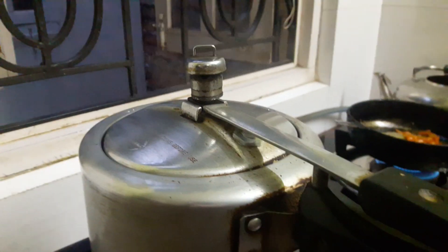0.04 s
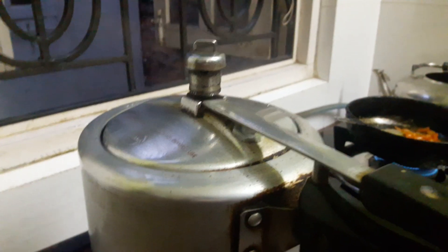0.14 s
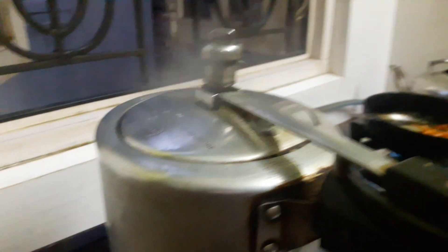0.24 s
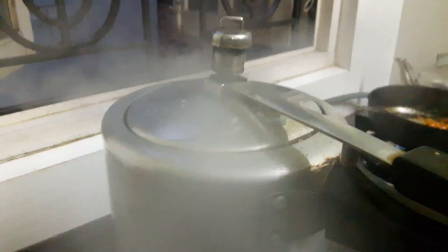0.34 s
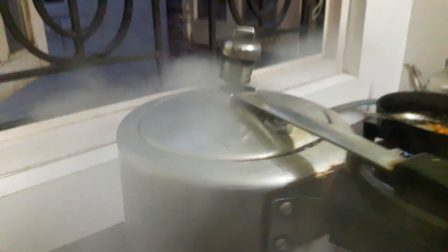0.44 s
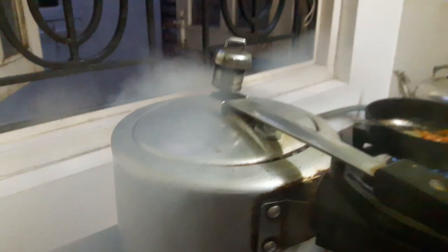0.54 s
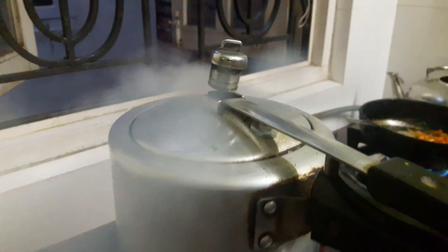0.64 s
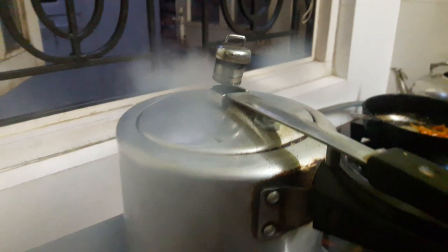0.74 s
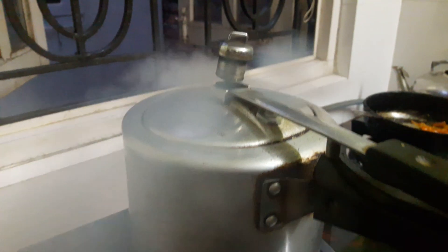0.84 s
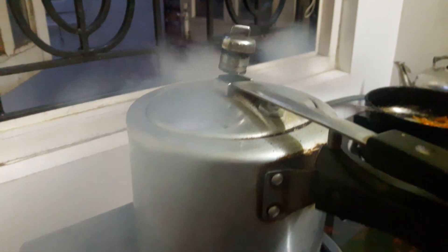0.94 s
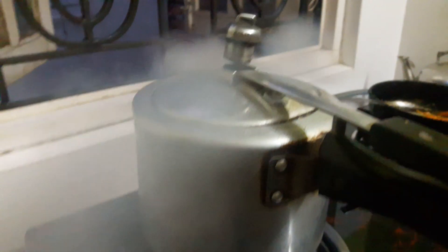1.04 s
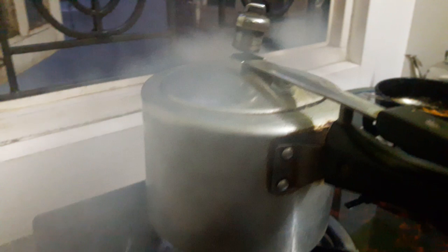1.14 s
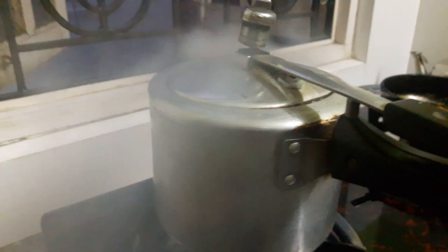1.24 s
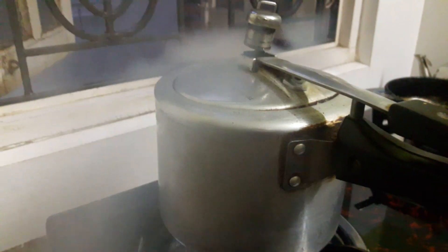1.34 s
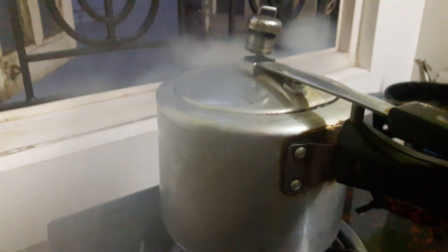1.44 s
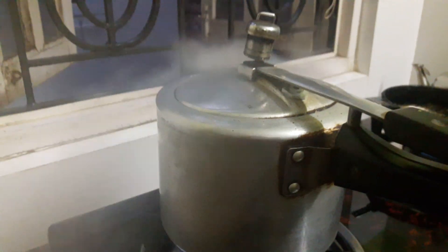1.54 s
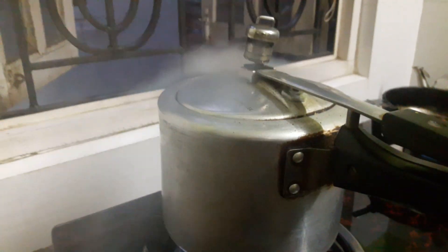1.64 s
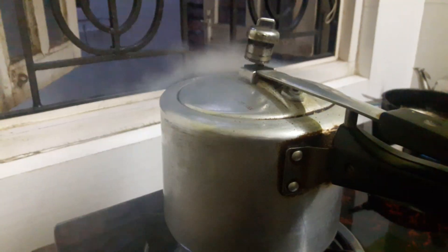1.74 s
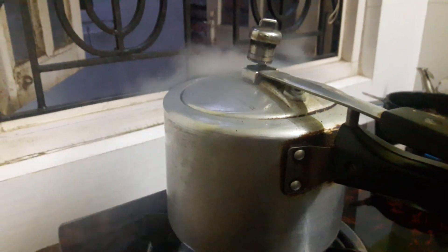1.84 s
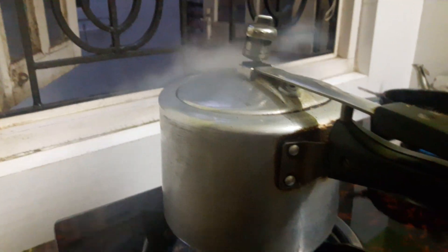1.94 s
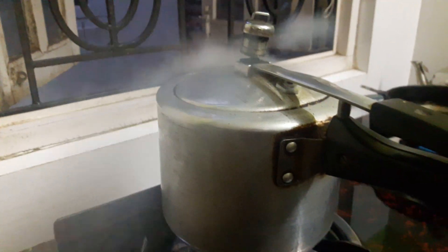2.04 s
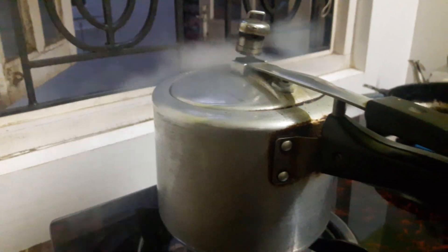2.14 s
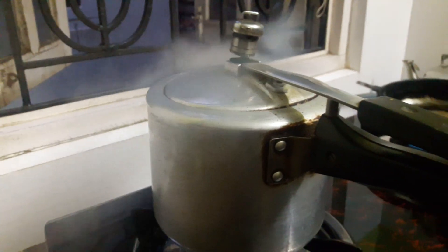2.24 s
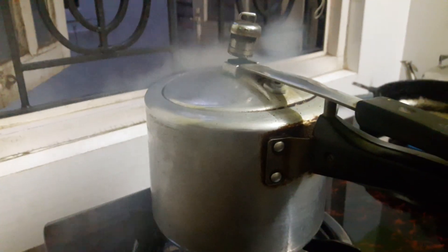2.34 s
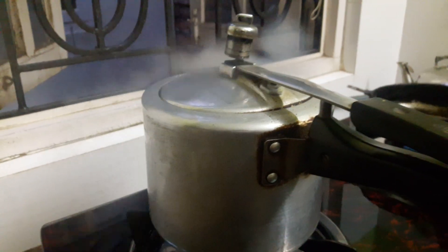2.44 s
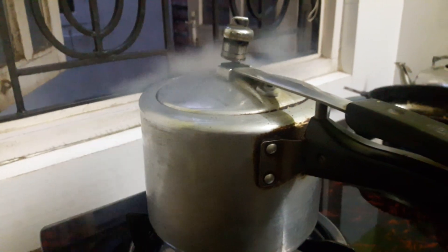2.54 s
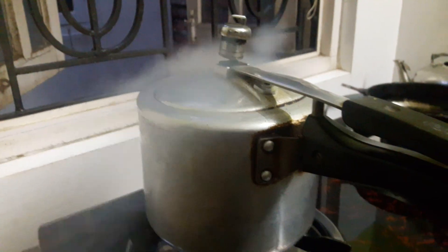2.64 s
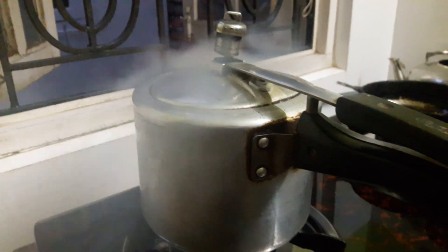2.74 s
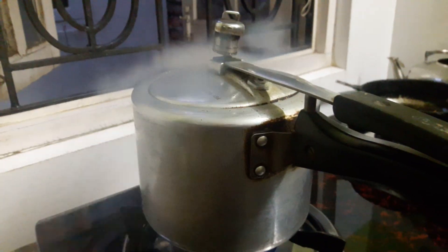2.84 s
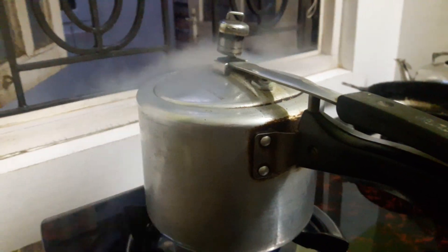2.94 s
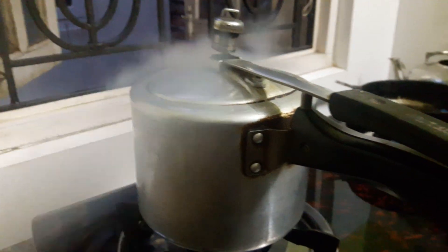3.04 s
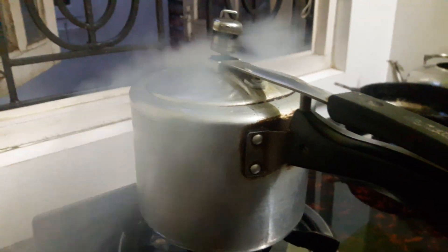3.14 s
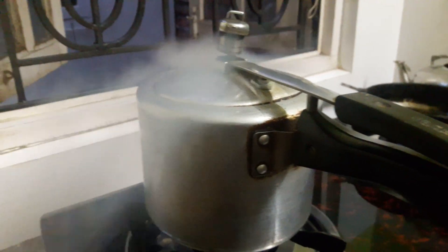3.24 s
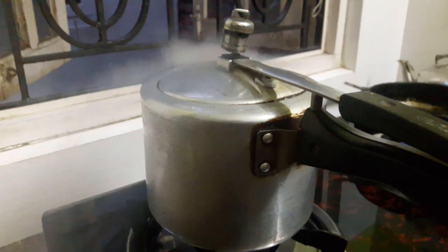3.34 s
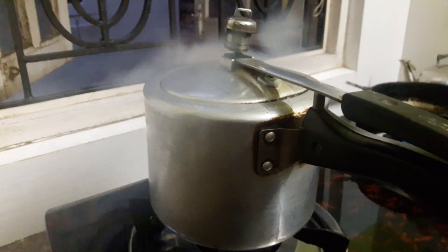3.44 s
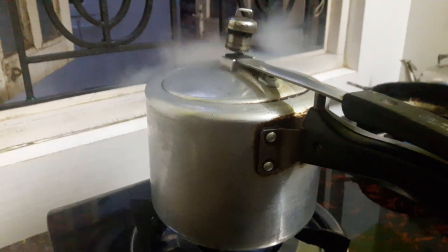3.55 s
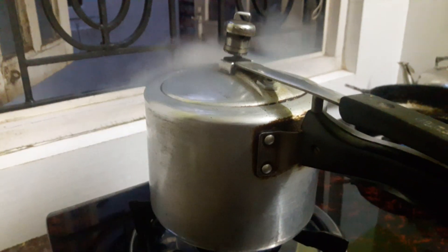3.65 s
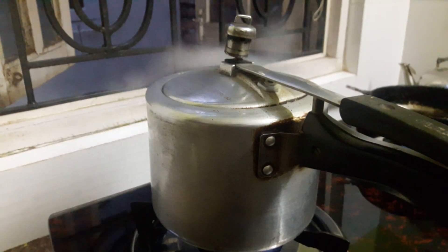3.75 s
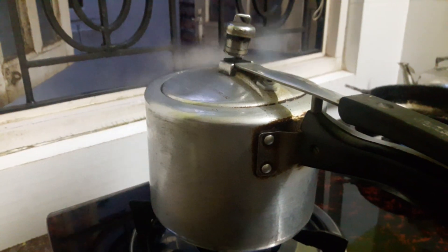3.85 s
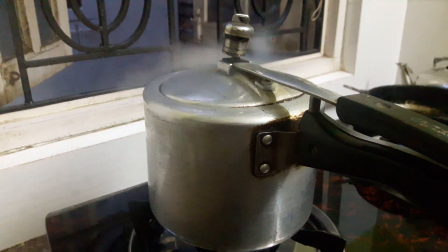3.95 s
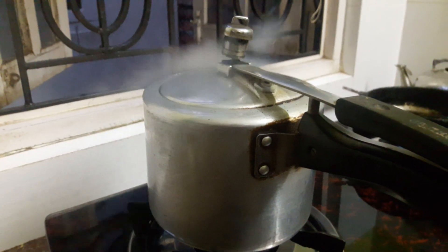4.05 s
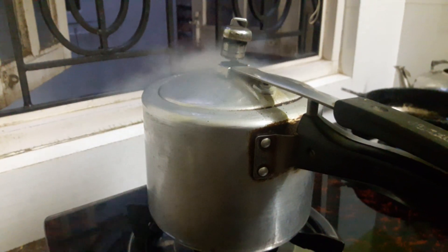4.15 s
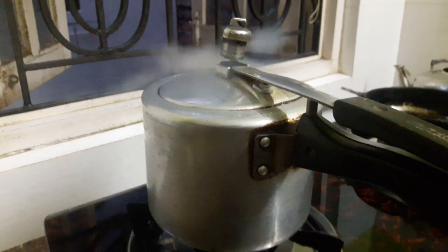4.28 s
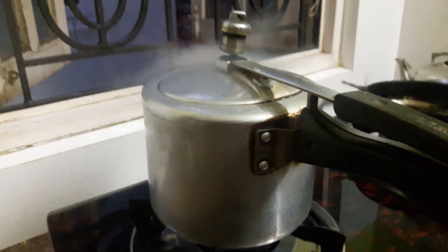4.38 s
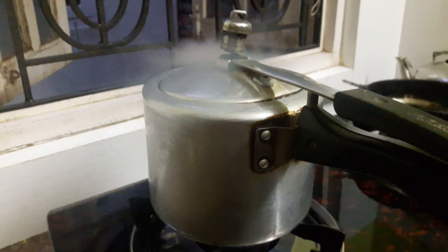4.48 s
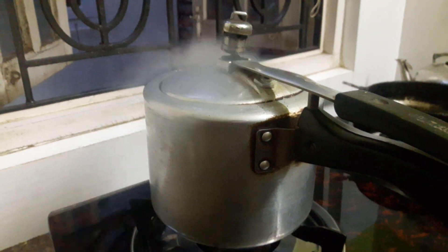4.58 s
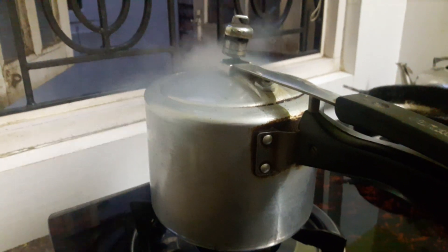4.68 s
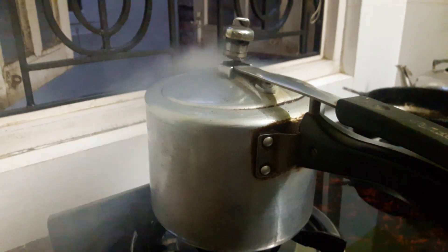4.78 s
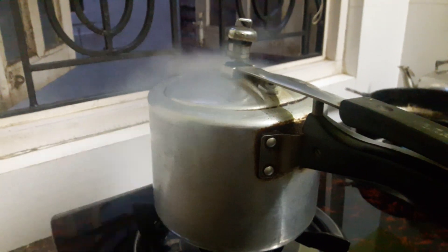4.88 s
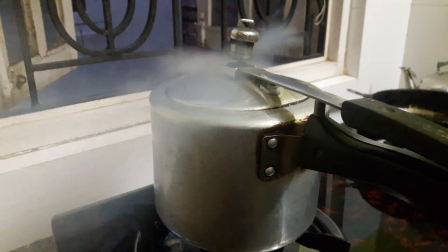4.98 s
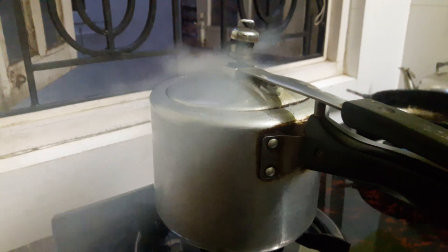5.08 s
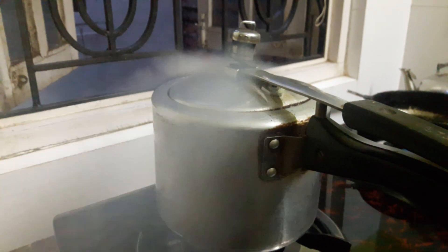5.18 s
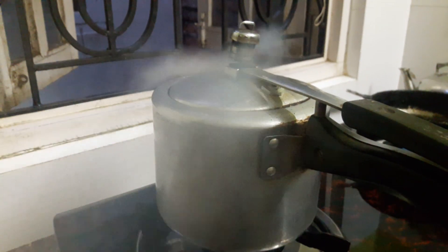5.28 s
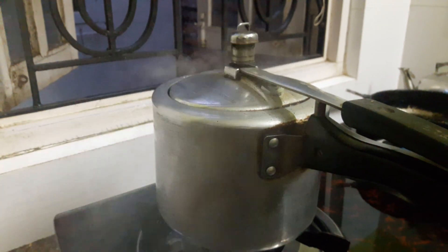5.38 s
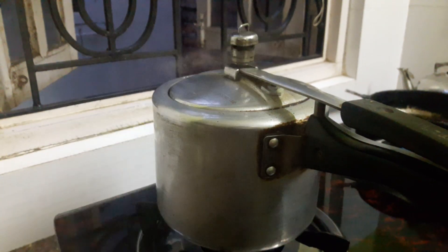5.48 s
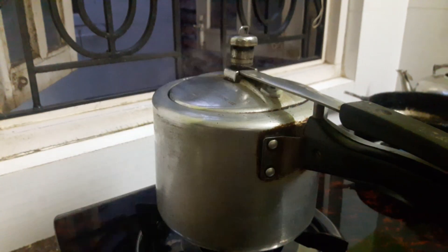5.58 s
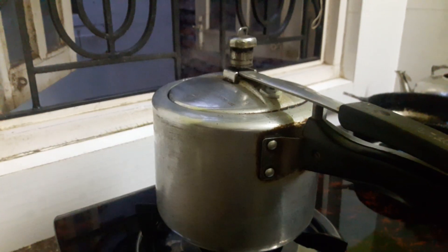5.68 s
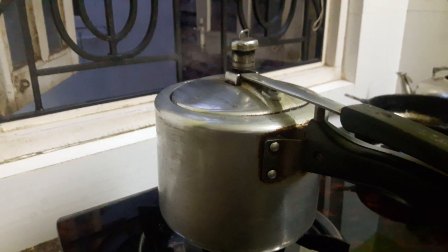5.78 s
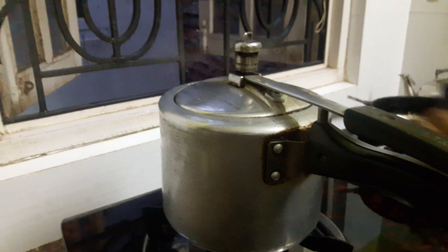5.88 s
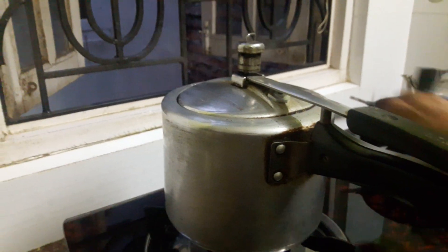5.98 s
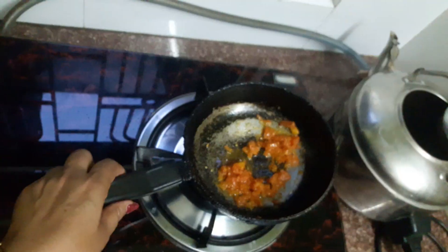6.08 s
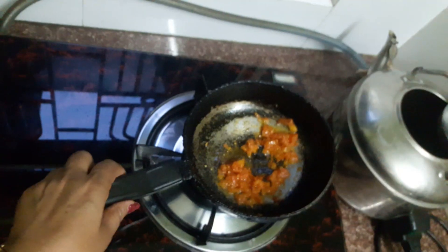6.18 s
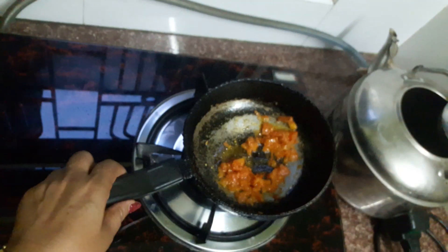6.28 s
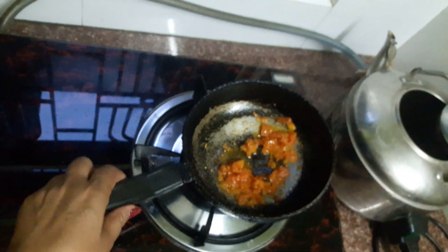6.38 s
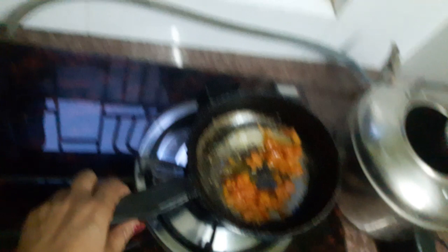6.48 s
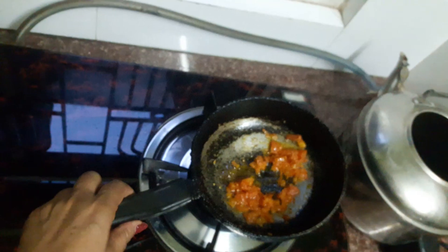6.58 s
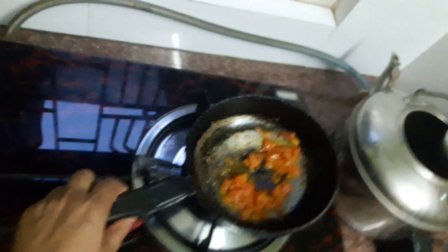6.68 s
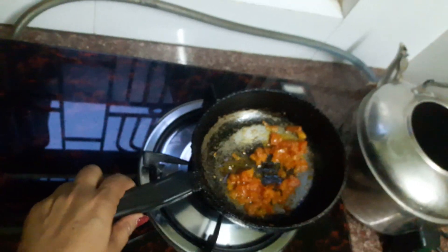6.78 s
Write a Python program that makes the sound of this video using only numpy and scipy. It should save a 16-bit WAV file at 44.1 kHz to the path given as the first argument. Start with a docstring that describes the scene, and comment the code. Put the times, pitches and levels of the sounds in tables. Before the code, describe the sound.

Very close to a stovetop pressure cooker in a kitchen, a thin hiss wavers and swells, then the weight lifts and steam blasts loudly with airy whistling bands and rough pops battering the microphone. It shuts off suddenly with a small thump and short ring. After a quiet gap, a frying pan sizzles close by, with spits and a dull knock.

```python
"""A kitchen, one mono microphone held close to a pressure cooker: a thin leak hisses through its valve.
The weight lifts and the leak swells to a jet, shaped noise with whistle bands and a room tail; the blast
buffets the microphone with dense low pops, random pressure jumps through a filter. The weight lands with
a thump, the steam shuts off, decaying tones ring and the hush sinks, with one last seep. Then the microphone
is over a frying pan: noise and tiny bursts sizzle, damped tones spit and knock, and low noise murmurs."""
import sys
import numpy as np
from scipy import signal
from scipy.io import wavfile
from scipy.ndimage import uniform_filter1d

SR = 44100
rng = np.random.default_rng(int(sys.argv[2]) if len(sys.argv) > 2 else 0)


def undo_db(level):
    """Turn decibels back into plain size, where 20 dB means ten times bigger."""
    steps = np.asarray(level, float) / 20
    return 10 ** steps


def master(y):
    """Save y as 16-bit WAV."""
    cut = np.clip(np.atleast_2d(y).T, -1, 1)
    pcm = np.round(cut * 32767)  # scale
    wavfile.write(sys.argv[1], SR, pcm.astype(np.int16))


N = 300762  # samples

LIFT_S, SHUT_S, PAN_S = 0.42, 5.464, 6.0825  # weight lifts, steam is shut off, microphone is over the pan
EDGE_HZ = 15720  # top of the recorded band
HOP, SIZE = 512, 2048  # noise frames, samples
HZ = np.fft.rfftfreq(SIZE, 1 / SR)[:, None]
FRAME_S = np.arange(N // HOP + 5) * HOP / SR


def evened(x):
    """Scales to rms 1."""
    return x / np.sqrt(np.mean(x ** 2) + 1e-20)


def read(points, hz):
    """Reads a spectrum at hz, straight between points on a log axis."""
    f, value = np.transpose(points)
    return np.interp(np.log(hz + 1), np.log(f + 1), value)


def columns(rows, t):
    """Reads every column of a curve at times t."""
    s, *cols = np.transpose(rows)
    return [np.interp(t, s, c) for c in cols]


def bumps(modes, hz):
    """Sums bell-shaped resonances in dB."""
    return sum(db / (1 + (2 * (hz - f) / width) ** 2) for f, width, db in modes)


def noise(field_db, patchy_db, flicker_db, lo_hz=20, hi_hz=EDGE_HZ):
    """Random short-time spectra, levelled between lo and hi, with drifting patches and a shared flicker."""
    real, imag, patches = rng.standard_normal((len(FRAME_S), len(HZ), 3)).T
    patches = uniform_filter1d(patches, size=24, axis=0)
    patches = evened(uniform_filter1d(patches, size=4, axis=1))
    flicker = evened(uniform_filter1d(rng.standard_normal(N), size=500))
    shape = undo_db(field_db + 0 * FRAME_S)
    in_band = (HZ > lo_hz) * (HZ < hi_hz)
    shape = shape / np.sqrt((shape ** 2 * in_band).sum(0))
    spectra = (real + 1j * imag) * shape * undo_db(patchy_db * patches)
    sound = signal.istft(spectra, nperseg=SIZE, noverlap=SIZE - HOP)[1][:N]
    return sound * np.sqrt(3 / 2) * undo_db(flicker_db * flicker)  # overlapping frames average down


def causal(gain_db):
    """Minimum-phase impulse for a gain in dB on an rfft grid."""
    log_gain = np.log(undo_db(np.r_[gain_db, gain_db[-2:0:-1]]))
    phase = -signal.hilbert(log_gain).imag
    return np.fft.ifft(np.exp(log_gain + 1j * phase)).real[:2048]


def add(mix, s, sound):
    """Mixes a sound in at s seconds."""
    part = mix[round(s * SR):][:len(sound)]
    part += sound[:len(part)]


# Kitchen hush with a low rumble: (frequency [Hz], relative density [dB per Hz])
HUSH_SPECTRUM = [(15, -38.5), (25, -10.5), (129, 0), (205, -9.5), (291, -3.5), (413, -9.5), (926, -11),
                 (5340, -16.5), (7380, -8.5), (8220, -12), (15700, -19.5)]


def hush():
    """Quiet kitchen noise sinks once the steam shuts off; a faint last seep comes from the valve."""
    leak_db, seep_db, seep_s, seep_wide_s = 4, 10, 5.84, 0.09
    valve_db = leak_db * (FRAME_S < LIFT_S) - 2.5
    valve_db = valve_db + seep_db * np.exp(-((FRAME_S - seep_s) / seep_wide_s) ** 2)
    field_db = read(HUSH_SPECTRUM, HZ) + bumps([(6900, 1100, valve_db)], HZ)
    quiet = noise(field_db, patchy_db=0.5, flicker_db=1.8, hi_hz=4990)
    steaming_db, shut_db, rest_db, settle_s = -67, -77, -92, 0.29  # before, at and long after the shut-off
    after = np.arange(N) / SR - SHUT_S
    settling_db = rest_db + (shut_db - rest_db) * np.exp(-abs(after) / settle_s)
    return undo_db(np.where(after < 0, steaming_db, settling_db)) * quiet


# Low murmur of the stove: (frequency [Hz], relative density [dB per Hz])
BURNER_SPECTRUM = [(20, -30), (50, -23), (105, 2.5), (140, -5), (180, -19), (350, -8), (450, -19),
                   (535, -6.5), (650, -15), (1200, -14), (3000, -24), (8000, -53)]


def burner():
    """A steady low murmur near the stove, made of shaped noise."""
    level_db = -69.5
    return undo_db(level_db) * noise(read(BURNER_SPECTRUM, HZ), patchy_db=1.0, flicker_db=-2.0)


# How long the kitchen rings: (frequency [Hz], decay by 60 dB [s])
ROOM_DECAY = [(200, 0.19), (1000, 0.4), (4000, 0.32), (8000, .34), (15000, 0.33)]


def kitchen(x):
    """Three sparse random tails, fed in turn as the microphone drifts; each band dies at its own speed."""
    at = np.arange(200, SR // 2 - 20, 20)
    out = np.zeros(N)
    for k in range(3):
        taps = np.zeros(SR // 2)
        taps[at + rng.integers(0, 20, len(at))] = rng.choice([-1., 1.], len(at))
        hz, t, z = signal.stft(taps, SR, nperseg=256)
        decay = undo_db(-60 * t / read(ROOM_DECAY, hz)[:, None])
        tail = signal.istft(z * decay, SR, nperseg=256)[1]
        turn = np.sqrt(2 / 3) * np.cos(2 * np.pi * (1.3 * np.arange(N) / SR + k / 3))  # 1.3 Hz drift
        out += signal.oaconvolve(x * turn, tail / np.linalg.norm(tail))[:N]
    return out


# Dull knocks near the pan, levels before the edge is dulled:
# (time [s], swing level [dB], frequency [Hz], decay by 60 dB [s], crack level [dB])
KNOCK_HITS = [(6.564, -49, 480, 0.014, -43), (6.566, -47, 125, .03, -60), (6.5856, -29.5, 370, 0.017, -30),
              (6.6838, -42.5, 345, .015, -57), (6.689, -50, 200, 0.026, -56), (6.754, -53, 300, 0.027, -70)]


def knocks():
    """A short crack together with a few heavily damped swings that sink in pitch."""
    out, u = np.zeros(N), np.arange(2000) / SR
    for s, db, hz, t60, crack_db in KNOCK_HITS:
        cycles = hz * (u + 0.00062 * (1 - np.exp(-u / 0.00028)))  # starts fast, then settles to hz
        swing = undo_db(db - 60 * u / t60) * np.sin(2 * np.pi * cycles)
        onset = 1 - np.exp(-u / 0.0001)
        crack = undo_db(crack_db - 60 * u / 0.0019) * np.sin(2 * np.pi * 1300 * u) * onset
        # a padded contact dulls the edge
        add(out, s, -uniform_filter1d(np.r_[np.zeros(8), swing + crack], size=7))
    return out


# The weight landing: (time [s], starting level [dB], frequency [Hz], decay by 60 dB [s])
WEIGHT_THUMP = (5.4415, -34, 160, .022)
# Tones of the pot as the steam shuts off, just after the thump:
# (frequency [Hz], mean starting level [dB], decay by 60 dB [s])
POT_TONES = [(538, -64.5, .42), (300, -71, .35), (931, -73, .3)]


def lid():
    """The weight lands with a thump, then the pot hums faintly, its decaying tones wavering in strength."""
    out, t = np.zeros(N), np.arange(SR // 2) / SR
    drift = uniform_filter1d(rng.standard_normal((len(POT_TONES), len(t))), size=900, axis=1)
    waver = 1 + 0.35 * evened(drift)
    s, db, hz, t60 = WEIGHT_THUMP
    add(out, s, undo_db(db - 60 * t / t60) * np.sin(2 * np.pi * hz * t))
    for strength, (hz, db, t60) in zip(waver, POT_TONES):
        add(out, SHUT_S, strength * undo_db(db - 60 * t / t60) * np.sin(2 * np.pi * hz * t))
    return out


# Fizz of the fat: (frequency [Hz], relative density [dB per Hz])
SIZZLE_SPECTRUM = [(300, -23), (1000, -16), (2000, -10), (3300, -10), (4200, -7), (5000, -4), (5700, -1.5),
                   (7400, 0.5), (8800, -1), (10500, -8), (13000, -13.5), (15700, -8)]
# Pan resonances: (frequency [Hz], width [Hz], gain [dB])
PAN_MODES = [(3780, 200, 3), (4590, 220, 4.5), (5840, 400, 1.5)]
# The fat flares: (time [s], rise over the bed [dB])
FAT_FLARES = [(6.083, 3), (6.145, 3), (6.225, 6), (6.36, 2), (6.5, 1.5), (6.8, 6)]
# Loudest fat spits: (time [s], starting level of the tone [dB], frequency [Hz])
FAT_SPITS = [(6.084, -43, 7460), (6.1268, -44, 10500), (6.1402, -45, 7200), (6.15, -44, 5200),
             (6.218, -40, 4400), (6.2248, -39, 5860), (6.2448, -46, 14300), (6.257, -47, 8300),
             (6.339, -45, 7100), (6.4973, -39, 9100), (6.547, -44, 6080), (6.6344, -41, 7850),
             (6.6448, -45, 13500), (6.666, -43, 7000), (6.681, -43, 4600), (6.785, -50, 6500)]


def frying():
    """Under the microphone a bed of noise flares, with tiny damped bursts and louder spits of fat."""
    t = np.arange(N) / SR
    # the band near 12.5 kHz opens as the microphone turns
    opening_db = np.interp(FRAME_S, (6.4, 6.75), (-3.5, 9))
    tilt_db = opening_db * np.exp(-((HZ - 12500) / 2800) ** 2)
    field_db = read(SIZZLE_SPECTRUM, HZ) + bumps(PAN_MODES, HZ) + tilt_db
    fizz = noise(field_db, patchy_db=2.1, flicker_db=1.3, lo_hz=3000, hi_hz=9900)
    bursts, u = np.zeros(N), np.arange(200) / SR
    for hz in np.geomspace(4200, 15000, 12):
        strength = undo_db(4.2 * np.minimum(rng.exponential(1, N), 3))
        train = (rng.random(N) < 30 / SR) * strength  # about 30 a second at each pitch
        grain = np.sin(2 * np.pi * hz * u) * undo_db(0.63 * read(SIZZLE_SPECTRUM, hz) - 60 * u / 0.003)
        bursts += signal.oaconvolve(train, grain)[:N]
    bed_db, rise_s, fall_s = -60.5, 0.012, 0.027
    flares_db = sum(db * np.exp(-abs(t - s) / np.where(t < s, rise_s, fall_s)) for s, db in FAT_FLARES)
    out = undo_db(bed_db + flares_db) * (fizz + undo_db(3) * bursts)
    for (s, db, hz), grit in zip(FAT_SPITS, rng.standard_normal((len(FAT_SPITS), 200))):
        spit = np.sin(2 * np.pi * hz * u) + 0.2 * np.diff(grit, prepend=0)
        add(out, s, undo_db(db - 60 * u / 0.0052) * spit)
    return out


# Blast on the close microphone: (time [s], relative level [dB], relative level of sharp edges [dB])
BLAST = [(.47, -40, -2), (.53, -36, -2), (.6, -38.5, 2), (1.1, -39.5, 3), (1.7, -38, 1), (2.2, -40.5, -1),
         (2.4, -37.5, -0.5), (2.6, -40, -1.5), (3.1, -38, -3), (3.45, -38.5, -1.5), (3.65, -37.5, -4.5),
         (3.85, -39, 2.5), (4.2, -40, 1.5), (5.3, -39.5, 2), (5.39, -38, -1), (5.42, -40.5, -17)]
# Colour of one pop: (frequency [Hz], relative density [dB per Hz])
POP_SPECTRUM = [(22, -40.5), (50, -17), (100, -1.5), (200, 2), (400, 2), (800, -0.5), (1600, -6),
                (2400, -9.5), (3400, -14), (5000, -18), (9000, -30.5), (16000, -21)]
# Lone pops as the blast arrives and leaves: (time [s], peak level [dB], sign [+1 or -1])
EDGE_POPS = [(0.403, -24.5, -1), (0.4408, -30, -1), (.444, -28, 1), (0.446, -28, -1), (0.455, -33, 1),
             (0.4618, -13.5, 1), (0.466, -27, -1), (5.419, -30.5, -1), (5.4345, -39.5, -1),
             (5.4408, -30, -1)]


def buffet():
    """Pressure jumps of either sign, clumped in gusts; each is a sharp edge and a slow swing back."""
    pops_per_s, first_share, thicken_s = 3500, 0.2, 0.12  # pops start sparse and thicken
    t = np.arange(N) / SR
    starts_s, ends_s = BLAST[0][0], BLAST[-1][0]
    level_db, edge_db = columns(BLAST, t)
    share = np.clip(first_share + (t - starts_s) / thicken_s, 0.05, 1)
    gusts = undo_db(0.5 * evened(uniform_filter1d(rng.standard_normal(N), size=400)))
    struck = rng.random(N) < pops_per_s * share / SR
    jumps = rng.standard_normal(N) * struck / np.sqrt(share)  # sparse pops are stronger
    jumps *= gusts * (t > starts_s) * (t < ends_s)
    shape = causal(read(POP_SPECTRUM, np.fft.rfftfreq(8192, 1 / SR)))
    pops = evened(signal.oaconvolve(jumps, shape)[:N])
    body = signal.sosfiltfilt(signal.butter(2, 1200, fs=SR, output="sos"), pops)
    rumble = signal.sosfiltfilt(signal.butter(2, 130, fs=SR, output="sos"), pops)
    rumble_gain = undo_db(np.clip(-0.73 * edge_db, -6, 6))  # blunter pops carry more rumble
    edges = undo_db(edge_db + 3.0) * (pops - body)
    out = undo_db(level_db + 2.5) * (rumble_gain * rumble + body - rumble + edges)
    soft = np.convolve(shape, signal.windows.hann(11))
    for s, db, sign in EDGE_POPS:
        add(out, s, np.sign(sign) * undo_db(db) * soft / abs(soft).max())
    return out


# Steam at the close microphone, as it drifts: (time [s], hiss level [dB], middle whistle gain [dB],
# brightness [negative dull, positive bright])
STEAM = [(0, -44.5, -4, -0.23), (.06, -55.5, 3.5, -0.31), (.13, -47.5, 4.5, 0.25), (.21, -47, -3, -0.2),
         (.28, -41.5, -0.5, 0), (.36, -37, 4.5, 0.3), (.42, -38.5, -2, -0.52), (.47, -43, 7.5, -.3),
         (.9, -41.5, 0.5, -0.36), (1.5, -42, 4, -0.79), (2.1, -42.5, 6, -0.86), (2.7, -43.5, 7, -1.2),
         (2.95, -41.5, 10, 0.37), (3.6, -41, 10.5, 0.77), (3.9, -40, 2, 0.46), (5.36, -40, 4, 0.69),
         (5.42, -45, 0.5, 0.08), (5.46, -50.5, 11, 1.2)]
# Turbulent hiss: (frequency [Hz], relative density [dB per Hz])
HISS_SPECTRUM = [(60, -38), (200, -24), (500, -13.5), (1000, -5.5), (1500, -5.5), (2600, -4.5),
                 (3600, -3.5), (5000, -5.5), (6000, -2), (7400, -2), (10000, -2.5), (13000, -4.5),
                 (15700, -6)]
# Valve cap resonances: (frequency [Hz], width [Hz], gain [dB])
CAP_MODES = [(8950, 380, 2.5), (11600, 820, 4), (4400, 200, 2)]
# Lowest, middle and highest whistle; the first two swell together: (frequency [Hz], width [Hz])
WHISTLE_BANDS = (5430, 160), (6550, 1000), (7350, 550)
# Bands that move with the brightness: (frequency [Hz], width [Hz], gain [dB per unit of brightness])
BRIGHT_BANDS = [(11200, 2100, 0), (13500, 2000, 4.5), (15300, 900, 0.5)]
# Hollows of the narrow first leak: (frequency [Hz], width [Hz], gain [dB])
LEAK_HOLLOWS = [(4550, 700, -7), (1500, 2000, -2)]
# Colour before the weight lifts: (frequency [Hz], width [Hz], gain [dB])
LEAK_BANDS = [(11000, 1000, 0), (13300, 1200, -1), (7500, 600, -1)]


def jet():
    """Turbulent hiss coloured by the valve cap, with whistle bands that wax and wane."""
    slit_opens_s, closing_s = 0.285, 0.0088
    _, middle_db, bright = columns(STEAM, FRAME_S)
    leaking = FRAME_S < LIFT_S
    lowest_db = middle_db - 3 - 3 * bright
    highest_db = 4 + 3.5 * bright - 0.26 * middle_db  # the middle whistle takes from the highest
    gains_db = (lowest_db, middle_db, highest_db)
    whistles_db = bumps([(*band, db) for band, db in zip(WHISTLE_BANDS, gains_db)], HZ)
    mids_db = np.where(leaking, -0.5, 0.5 - 0.15 * middle_db)  # and, once lifted, from the mids
    slopes_db = mids_db / (1 + (HZ / 4800) ** 8)
    slopes_db = slopes_db + 4 * bright * np.log2(np.maximum(HZ, 9000) / 9000)  # brightness tilts the top
    slopes_db += -6 * leaking / (1 + (HZ / 2500) ** 4)  # the leak is thin in the lows
    leak_db = (FRAME_S < slit_opens_s) * bumps(LEAK_HOLLOWS, HZ) + leaking * bumps(LEAK_BANDS, HZ)
    field_db = read(HISS_SPECTRUM, HZ) + bumps(CAP_MODES, HZ) + whistles_db + slopes_db + leak_db
    field_db = field_db + bright * bumps(BRIGHT_BANDS, HZ)
    hiss = noise(field_db, patchy_db=1.82, flicker_db=0.0, lo_hz=8160, hi_hz=15550)
    t = np.arange(N) / SR
    closing = np.clip((SHUT_S - t) / closing_s, 0, 1)
    return undo_db(columns(STEAM, t)[0]) * closing * hiss


# Port resonance of the microphone and its dip: (frequency [Hz], width [Hz], gain [dB])
MIC_PORT = [(6900, 300, 3), (7990, 310, -6.5)]


def microphone(x):
    """The port colours the sound, a filter cuts the lows and the preamplifier rounds off loud peaks."""
    low_cut_hz, ceiling = 40, 0.08
    port = causal(bumps(MIC_PORT, np.fft.rfftfreq(4096, 1 / SR)))
    coloured = signal.oaconvolve(x, port)[:N]
    coloured = signal.sosfilt(signal.butter(2, low_cut_hz, "high", fs=SR, output="sos"), coloured)
    return ceiling * np.tanh(coloured / ceiling)


# Instants when the sound thins to a few faint tones: (time [s], depth [dB])
THIN_MOMENTS = [(0.499, -22), (0.616, -16), (1.289, -11), (1.387, -11), (2.175, -17), (2.847, -11),
                (2.938, -13), (3.01, -11), (3.335, -10), (3.554, -49), (5.402, -17)]


def thinned(x):
    """At each listed instant the spectrum above 1.5 kHz sinks, except its few strongest lines."""
    hz, t, z = signal.stft(x, SR, nperseg=1024, noverlap=896)
    dip_db = np.zeros(z.shape)
    for s, db in THIN_MOMENTS:
        now = abs(z[:, abs(t - s) < 0.004]).mean(1)
        weak = (now < 1.8 * uniform_filter1d(now, size=60)) * (hz > 1500)
        dip_db += db * np.outer(weak, np.exp(-((t - s) / 0.0105) ** 4))
    return signal.istft(z * undo_db(dip_db), SR, nperseg=1024, noverlap=896)[1][:N]


def scene():
    """The close cooker in its kitchen, then a jump to the pan."""
    steam = jet()
    room_db = -5.5
    cooker = steam + undo_db(room_db) * kitchen(steam) + buffet() + lid() + hush()
    pan = frying() + burner() + knocks()
    mono = np.where(np.arange(N) < PAN_S * SR, cooker, pan)
    return np.array([mono, mono])


def low_pass(x):
    """Removes everything above the highest recorded frequency."""
    return signal.sosfilt(signal.butter(12, 16910, fs=SR, output="sos"), x)


def record(dry):
    """One microphone feeds both channels: port colour, soft overload, brief thinning and a band limit."""
    heard = thinned(microphone(dry[0]))
    band_limit = signal.firwin(1023, EDGE_HZ, window=("kaiser", 9), fs=SR)
    limited = signal.oaconvolve(heard, band_limit, "same")
    return low_pass(np.array([limited, limited]))


dry = scene()
out = record(dry)
master(out)
```